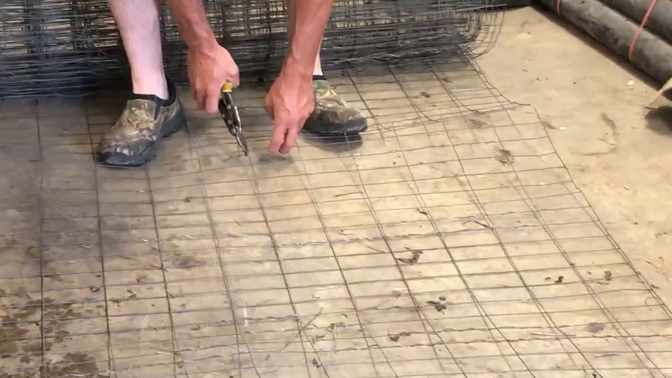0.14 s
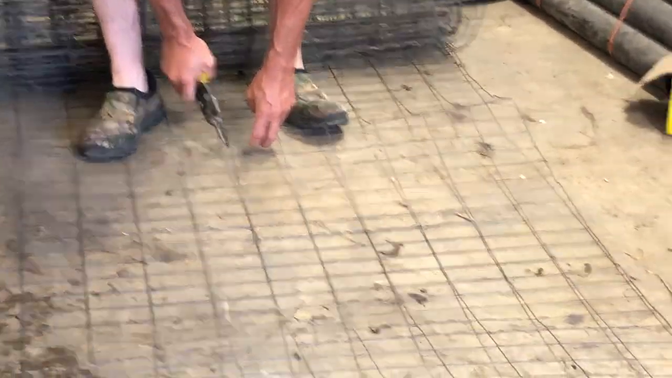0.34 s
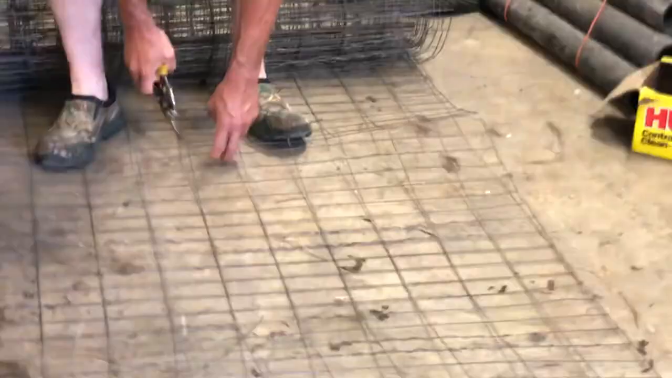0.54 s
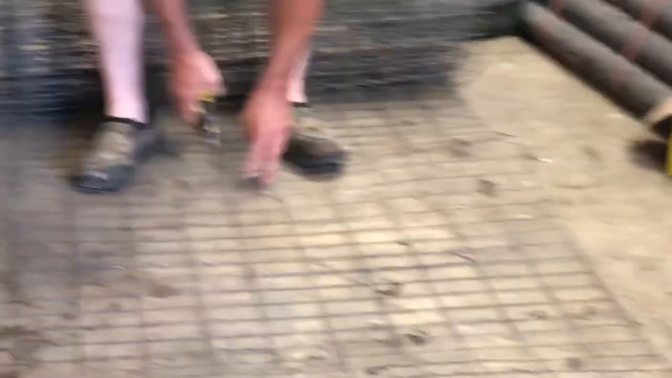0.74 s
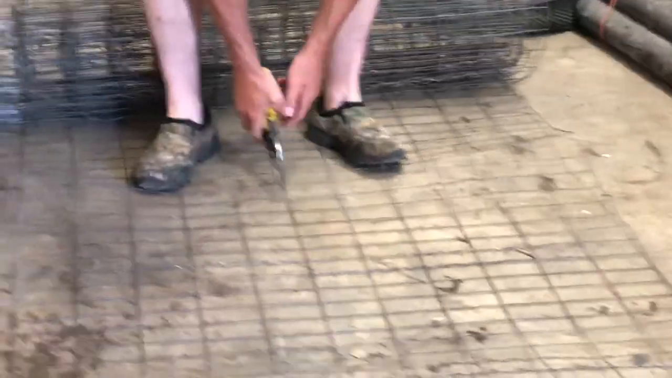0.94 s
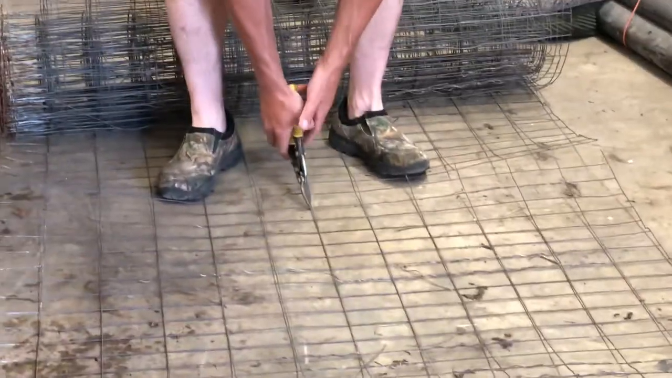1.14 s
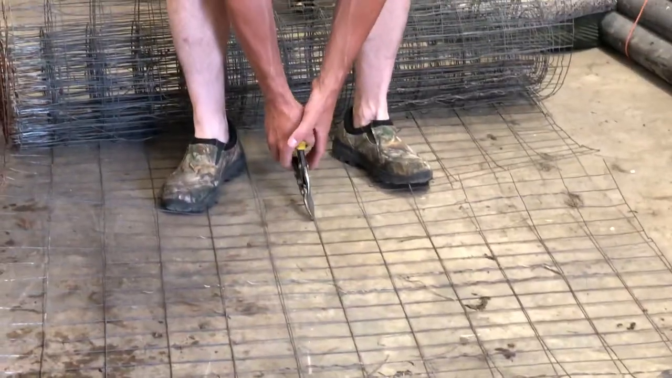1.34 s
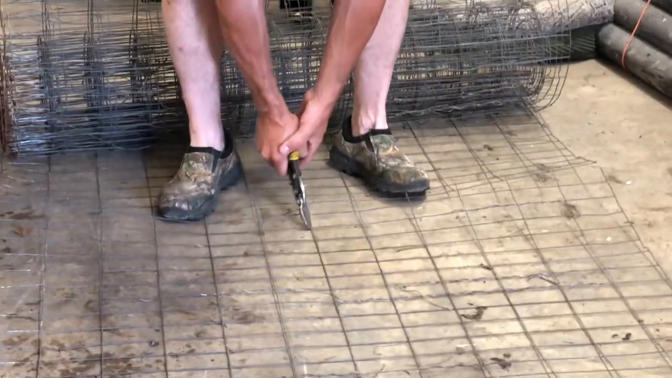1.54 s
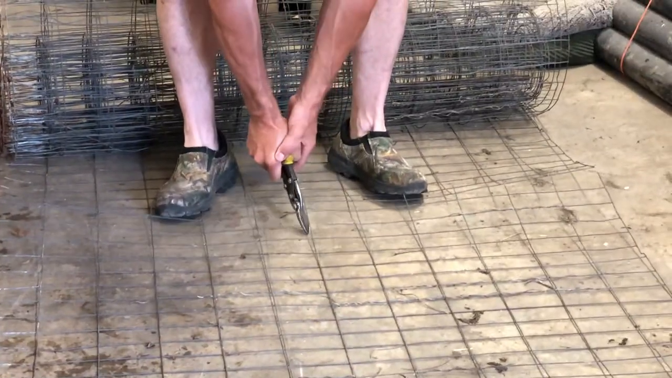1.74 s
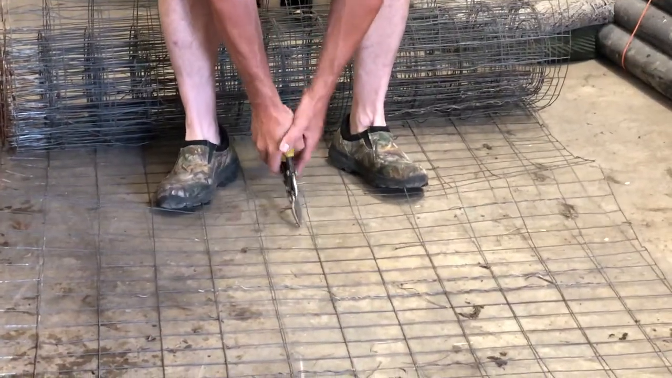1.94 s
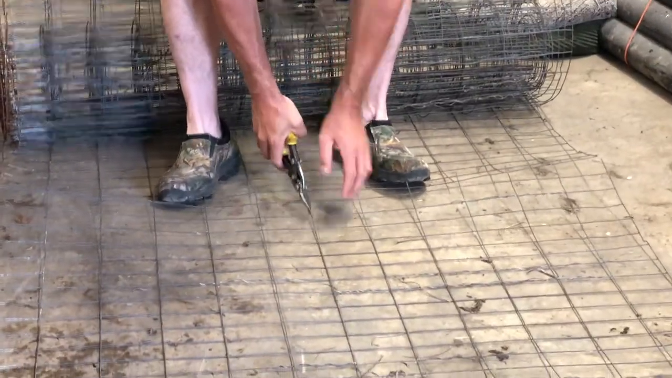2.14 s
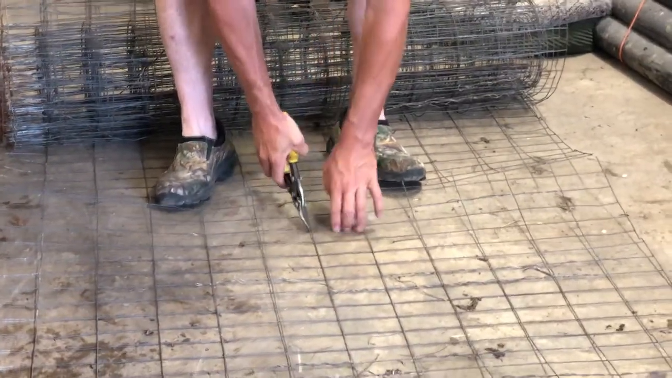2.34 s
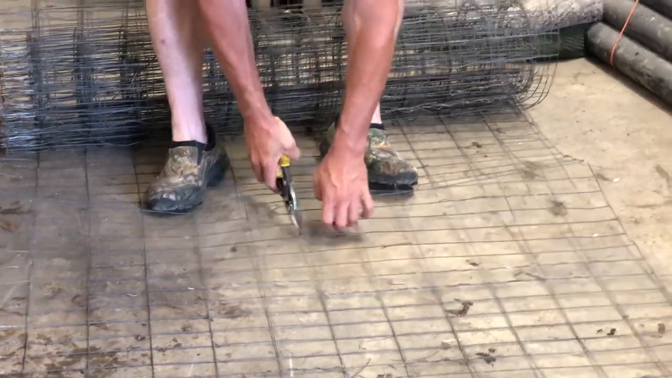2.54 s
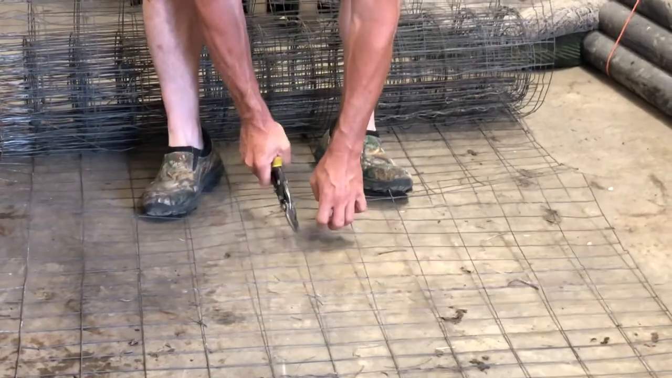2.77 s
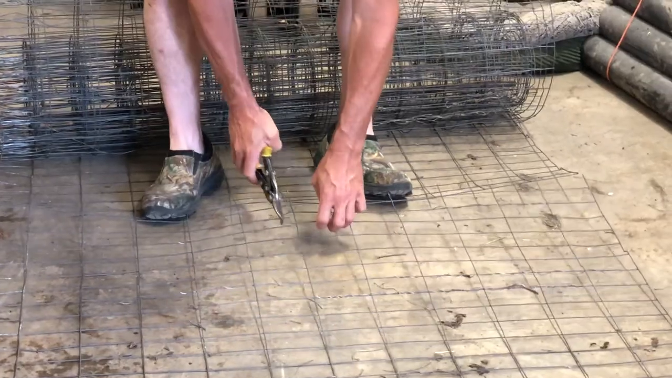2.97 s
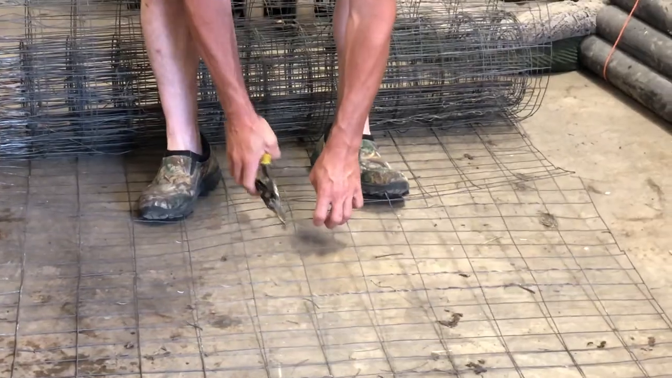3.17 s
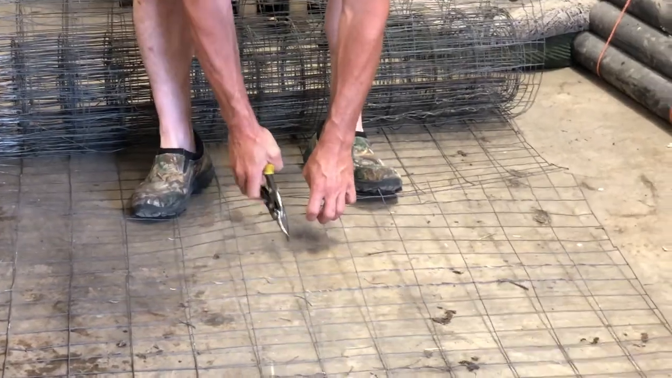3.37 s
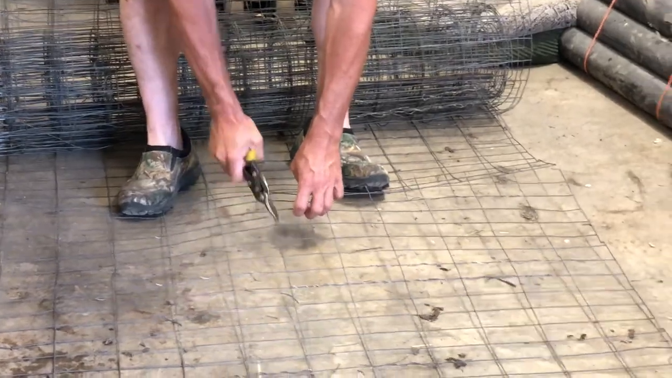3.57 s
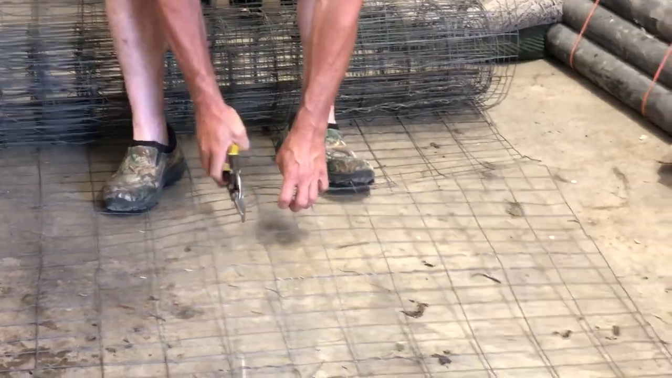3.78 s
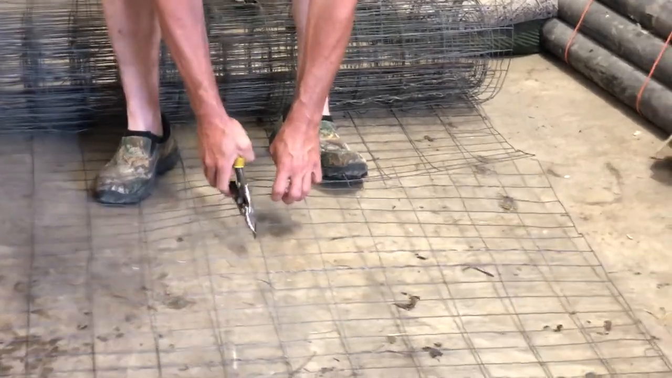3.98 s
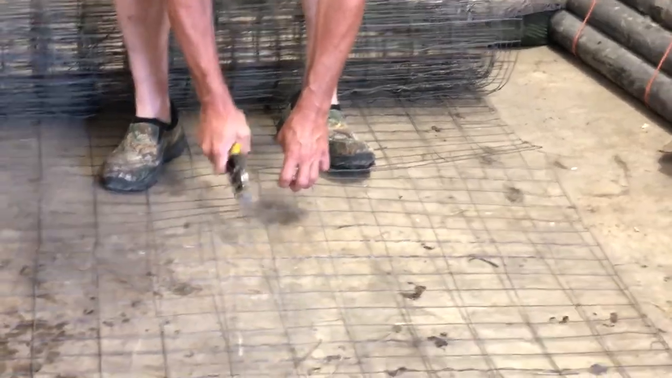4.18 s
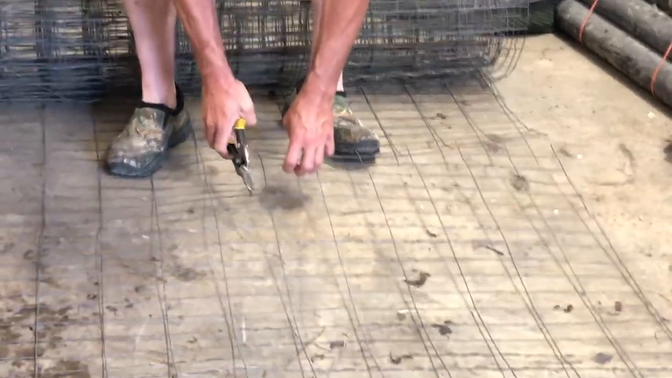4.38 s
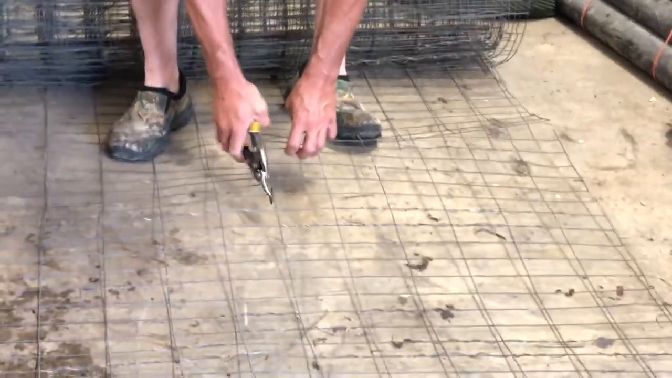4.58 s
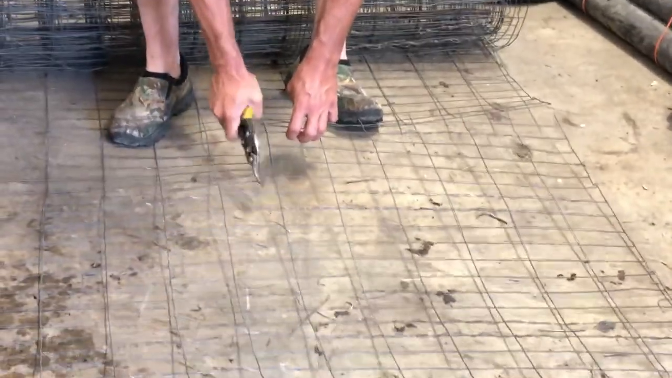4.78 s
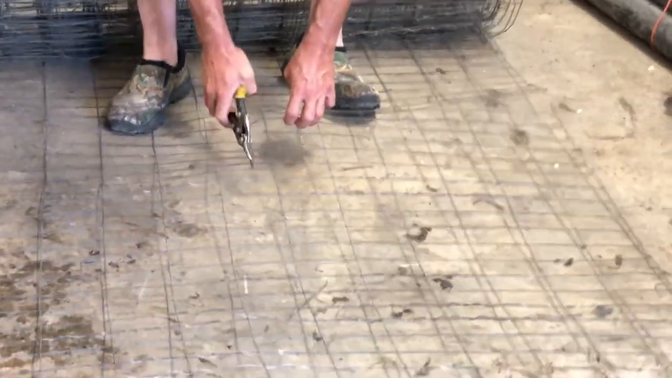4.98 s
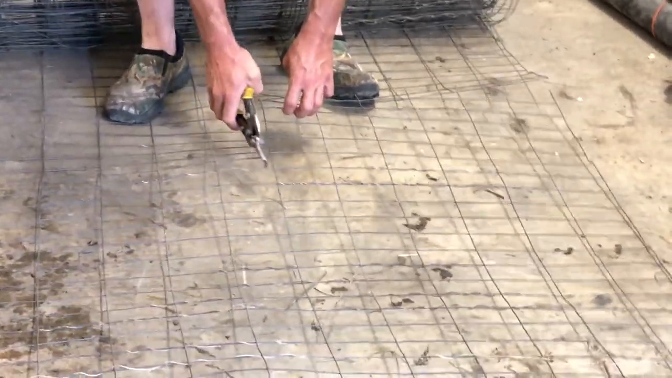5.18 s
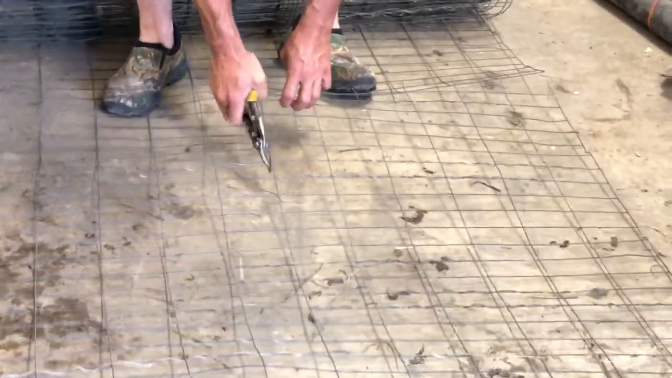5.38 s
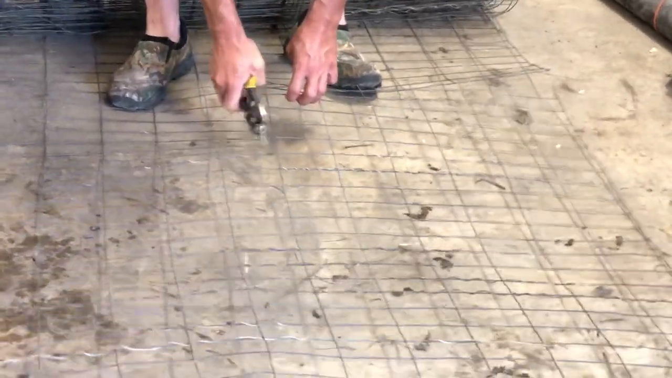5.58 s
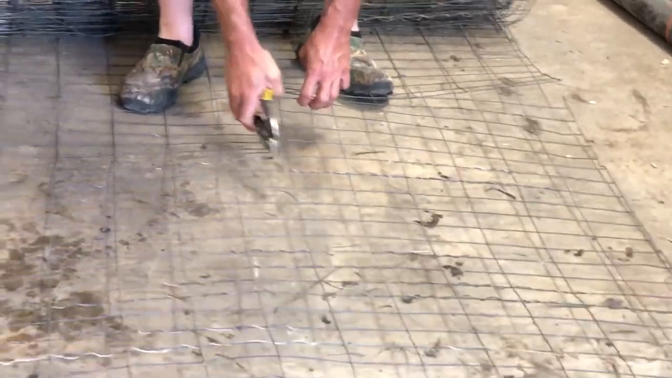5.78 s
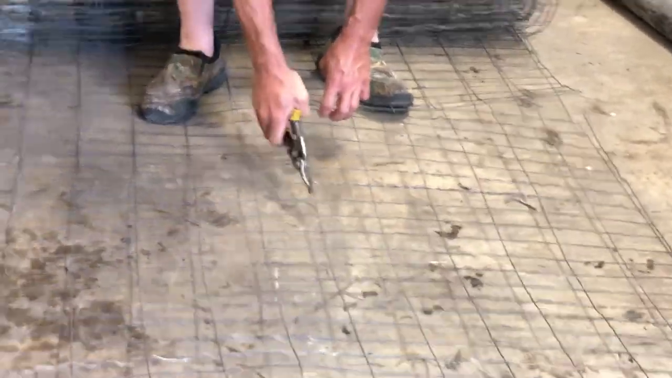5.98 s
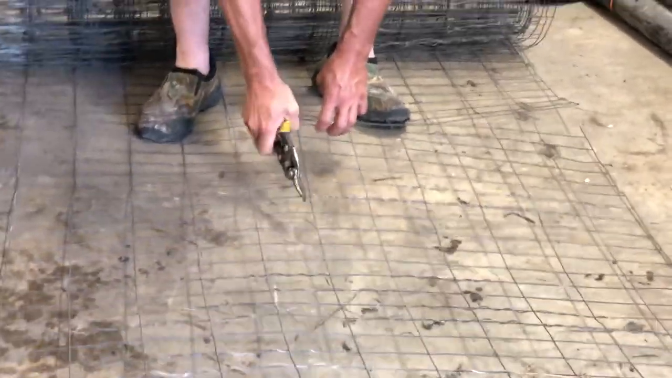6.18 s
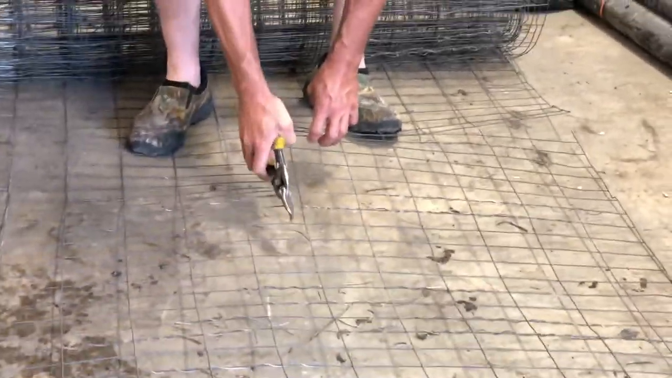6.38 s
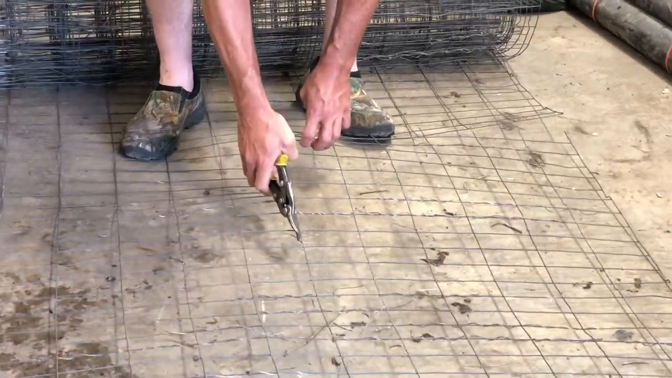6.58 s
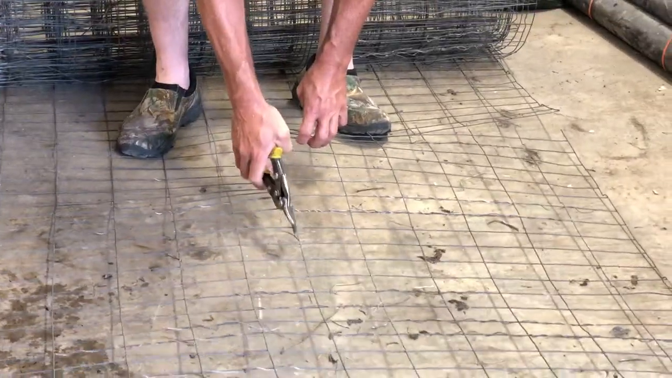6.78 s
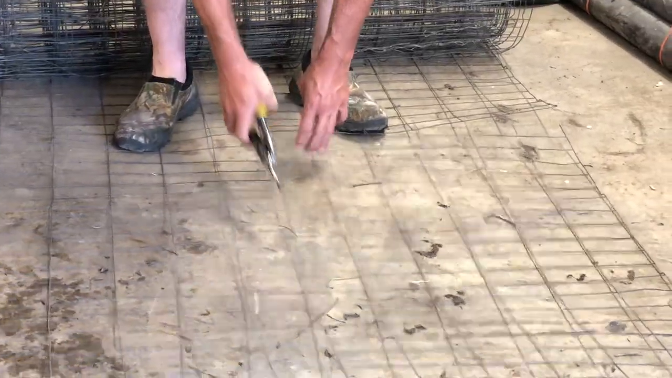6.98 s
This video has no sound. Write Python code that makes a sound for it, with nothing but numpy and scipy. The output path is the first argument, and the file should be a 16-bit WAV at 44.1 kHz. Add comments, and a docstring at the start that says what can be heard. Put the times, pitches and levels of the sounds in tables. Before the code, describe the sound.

Over a faint rush of air and a low motor hum, snips snap through wire fencing eight times, twice with long pauses and then in a steady run. The loud metallic cracks ring briefly and echo around a big workshop as the mesh slaps the floor. Small metal ticks and gritty scrapes of wire on concrete fill the gaps, growing busier in the second half.

```python
"""Air noise and a throbbing motor hum fill a large workshop throughout. Hand snips tick on a welded
wire mesh, which scrapes on the concrete floor. Then the first cut: the strand parts with a crack, the
jaws clap shut, the mesh slaps the floor, the steel rings and the hall answers. After a second cut the
mesh is lifted and six more follow at a quicker pace, with ticks and scrapes between them.
Just after the last cut the level dips briefly; a final tick and scrapes close the scene."""
import sys
import numpy as np
from scipy import signal
from scipy.fft import rfft, irfft
from scipy.io import wavfile
from scipy.ndimage import uniform_filter1d

SR = 44100
rng = np.random.default_rng(int(sys.argv[2]) if len(sys.argv) > 2 else 0)


def dump(signal):
    """Clip the signal to [-1, 1] and save it as 16-bit WAV at the path in sys.argv[1]."""
    limited = np.clip(np.atleast_2d(signal).T, -1, 1)
    pcm = np.round(limited * 32767).astype(np.int16)
    wavfile.write(sys.argv[1], SR, pcm)


N = 309582

# Colour of the moving air. Each row: frequency in Hz, relative level in dB.
AIR_COLOUR = [(18, -46.5), (30, -6.5), (50, -9.5), (64, -10), (77, -1), (179, -2), (345, -6.5), (393, -2),
              (460, -9), (567, -11.5), (757, -12.5), (1660, -20), (2110, -21.5), (4630, -25.5),
              (7230, -26.5), (10200, -27), (15900, -40.5)]
# Steady motor tones; the lowest three beat together. Each row: pitch in Hz, level in dB.
MOTOR_TONES = [(57.43, -65.5), (58.65, -68.3), (58.96, -75.2), (81.8, -80), (114.9, -76), (120, -79.5),
               (398.4, -78)]
# Wavering motor tones. Each row: pitch in Hz, width in Hz, level in dB.
MOTOR_WHIRS = [(173, 10, -70.5), (233, 3, -72.5), (290, 3.3, -73.5), (400, 8, -76.5)]
# Small metal ticks: snips touching the wire, and the bright starts of mesh scrapes.
# Each row: start in seconds, level in dB, pitch in Hz, width in Hz, tail over the tick in dB.
METAL_TICKS = [(.134, -45, 4380, 600, -21), (0.364, -43, 6860, 3060, -24), (.375, -41.5, 6030, 3000, -22),
               (0.9477, -35, 1495, 694, -21.5), (1.172, -53, 4300, 400, -15),
               (1.251, -60, 12000, 4000, -15), (1.382, -59, 6200, 890, -19), (1.436, -47, 1395, 496, -24),
               (1.587, -51, 5600, 912, -25), (1.657, -55, 5600, 900, -22), (1.693, -44.5, 5040, 3860, -14),
               (1.707, -43.5, 3050, 300, -15), (2.294, -44.5, 5040, 5140, -37),
               (2.343, -47, 4500, 700, -17), (2.367, -49, 5000, 710, -19), (2.501, -51, 4350, 170, -10),
               (2.582, -55, 11400, 900, -20.5), (3.299, -53, 13200, 2000, -11.5),
               (3.368, -45.5, 11600, 2000, -20), (3.94, -49, 4320, 400, -14.5),
               (4.052, -47, 11900, 1496, -13), (4.5761, -33, 1500, 1200, -21),
               (4.577, -38.5, 4500, 1500, -19), (4.613, -38, 11600, 3000, -16.5),
               (5.2575, -47.5, 13500, 2000, -13.5), (6.5166, -34.5, 4400, 610, -18)]
# Decay of the hall. Each row: frequency in Hz, t60 in seconds.
HALL_DECAY = [(150, 1), (300, 1.38), (420, 1.11), (1040, 0.94), (1850, 1.044), (2760, 0.88), (4500, 0.85),
              (7280, 0.67), (15000, 0.39)]
# Pipes and rolls of mesh that ring on. Each row: pitch in Hz, width in Hz, weight in dB, t60 in seconds.
HOLLOW_MODES = [(426.6, 11, 2.5, 2.15), (1810, 350, -9, 1.8)]
# Mesh dragged on concrete. Each row: start in seconds, time until it fades in seconds, fizz level in dB,
# change over that time in dB, grind over fizz in dB, upper over lower fizz in dB.
MESH_DRAGS = [(0.142, .03, -67.5, -10, 2, 3), (0.958, 0.19, -57.5, -18, 2.5, 4),
              (1.376, .12, -76, 4.5, 14, -7), (1.633, 0.097, -81.5, 31, 1, 12),
              (2.352, 0.13, -58.5, -10.5, 7.5, -1), (2.502, 0.28, -59, -2, 6.5, 4.5),
              (3.05, 0.22, -65.5, -6, 6, 2), (3.302, .07, -63, 3.5, 7, 7),
              (3.369, 0.095, -48.5, -1, 1, 7.5), (3.601, 0.61, -58, -2.5, 3.5, -3),
              (3.94, 0.12, -52, 2, 0, 1.5), (4.049, .09, -50.5, 3.5, 1, 5), (4.301, 0.49, -62, 10, 0, -6),
              (4.599, .18, -54, 1, 2, -8), (4.952, .29, -56, -2.5, 4, 1), (5.254, 0.1, -55, -1, 3, 4.5),
              (5.348, 0.074, -55, 6.5, 3, -3.5), (5.547, 0.21, -51, -1.5, 1.5, 3.5),
              (5.751, 0.14, -54, -4.5, 4.5, 3), (5.881, 0.24, -49.5, -3.5, 2.5, -3),
              (6.249, 0.29, -55, 1.5, 1.5, 4.5), (6.517, .14, -48, -13.5, 2.5, 8),
              (6.561, 0.41, -54, -9.5, 5.5, -8.5)]
# Colours of a drag's fizz and grind and a strand's crack. Each row: frequency in Hz, weight in dB.
FIZZ_COLOUR = [(1800, -25), (3000, -5), (5000, -4), (7000, -1), (9000, 0), (11800, 1), (13500, -1),
               (15900, -3)]
GRIND_COLOUR = [(180, -30), (300, 2), (590, -6), (1010, -4.5), (1350, -7), (1760, -5), (3250, -8.5),
                (6000, -14), (7800, -34), (13200, -120)]
CRACK_COLOUR = [(59, -57.5), (100, -17), (349, -3.5), (423, -4), (460, -6), (799, -3.5), (1200, -6.5),
                (1450, -8.5), (2210, -6.5), (3600, -6.5), (4950, -11), (5870, -5), (15900, -10)]
# The strands being cut. Each row: start in seconds, crack in dB, mesh ring in dB, jaw clap delay in
# seconds, clap in dB, thump in dB, lift off the floor from 0 to 1, mode pitch as a ratio.
STRAND_CUTS = [(0.3856, -4, -14.5, .0120, -23.5, -13.5, 0, 1),
               (1.7167, -3, -12.5, 0.012, -20.5, -38.5, 0.16, 0.99),
               (2.731, -8, -21.5, 0.007, -6, -12, 0.96, 0.99),
               (3.4748, -6.5, -20.5, 0.0053, -4.5, -10, 0.88, 0.997),
               (4.1372, -6, -19, 0.0068, -6.5, -9, 0.78, 0.99),
               (4.7765, -8, -22, 0.0068, -9, -11, 0.86, 0.974),
               (5.4334, -7, -21, 0.0056, -8.5, -11.5, 0.8, 1.005),
               (6.0612, -2.5, -15.5, 0.0054, -6.5, -15, 0.7, 0.993)]
# Modes of mesh, snips and wire in seven groups. Each mode: pitch in Hz, width in Hz, weight in dB.
STEEL_MODES = [
    [(508, 95, 9.5)],
    [(890, 1100, 10)],
    [(1400, 160, 13)],
    [(2870, 330, 12)],
    [(4416, 370, 13.5)],
    [(4710, 85, 13.5), (5080, 260, 19)],
    [(7040, 420, 11.5), (9340, 1900, 12.5), (12100, 220, -1.5)],
]
# How a cut shakes the mesh, lying and lifted. Each lists: seven mode group weights in dB,
# tilt in dB per octave, crack t60 in seconds.
MESH_LYING = (0.5, -26, -5, -2, 2, -5, -8.5, 0.98, 0.0528)
MESH_LIFTED = (-7.5, 1, -10, -3, -0.5, 1.4, -4.5, 0.76, 0.0725)
# A brief dip in level. Each row: time in seconds, gain in dB.
LEVEL_DIP = [(6.193, -11), (6.202, -24), (6.207, -23.5), (6.213, -12.5)]

AIR_DB, HUM_SWELL_S = -55.5, 4.82  # at this moment the motor tones swell together
RISE_S, BUILD_S = .0004, .010  # attack of a crack, bloom of hall and mesh ring
TICK_T60, TICK_RING = .012, 6.0  # shortest decay in seconds, extra decay times width in s Hz
DRAG_RISE_S, DRAG_T60 = .0054, .15
CATCHES_PER_S, CATCH_DB = 150, -1  # wire ends snagging during a drag
CLAP_T60, RING_T60 = .021, .49
THUMP_HZ, THUMP_END_HZ, THUMP_T60, THUMP_LAG_S = 1500, 220, .022, .0013  # the lag follows the clap
SLAP_DB, SLAP_SHARE, SLAP_HZ = -12, .21, 700  # usual thump over crack; a harder slap adds bass
ROOF_S, ROOF_DB, ROOF_T60 = .0243, -7.5, .012  # roof echo of the crack
WALL_S, WALL_DB = .043, -9  # wall echo of the thump
LOW_CUT_HZ, HIGH_CUT_HZ = 45, 15880


def gain_of(db):
    return 10 ** (np.asarray(db) / 20)


def unit_rms(x):
    return x / np.sqrt(np.mean(x ** 2) + 1e-20)


def curve_at(points, hz):
    f, value = np.transpose(points)
    return np.interp(np.log(hz + 1), np.log(f + 1), value)


def add(mix, start_s, sound):
    part = mix[round(start_s * SR):][:len(sound)]
    part += sound[:len(part)]


def shaped(gain, size):
    """Noise of rms 1 whose spectrum follows gain(hz)."""
    return unit_rms(irfft(rfft(rng.standard_normal(size)) * gain(np.fft.rfftfreq(size, 1 / SR)), size))


def coloured(points, size):
    return shaped(lambda hz: gain_of(curve_at(points, hz)), size)


def resonate(x, hz, width):
    return signal.lfilter(*signal.iirpeak(hz, hz / width, SR), x)


def peak(hz, centre_hz, width):
    """Power of a resonance, 1 at its centre."""
    return 1 / (1 + (2 * (hz - centre_hz) / width) ** 2)


def dying(t, t60, rise):
    return gain_of(-60 * t / t60) * (1 - np.exp(-t / rise))


def workshop():
    """The bed: moving air, close motor tones beating into a throb, and faint whirs above."""
    t = np.arange(N) / SR - HUM_SWELL_S
    hum = sum(np.sqrt(2) * gain_of(db) * np.cos(2 * np.pi * hz * t) for hz, db in MOTOR_TONES)
    whirs = sum(gain_of(db) * unit_rms(resonate(rng.standard_normal(N), hz, width))
                for hz, width, db in MOTOR_WHIRS)
    return gain_of(AIR_DB) * coloured(AIR_COLOUR, N) + hum + whirs


def tick(db, centre_hz, width, tail_db):
    """A small metal tick: a wide click, a ring that lasts longer the narrower it is, and a hall tail."""
    t = np.arange(4096) / SR
    ring = lambda hz: peak(hz, centre_hz, width)
    click = lambda hz: hz / (hz + 1500) / (1 + hz / 9000)
    out = gain_of(db + tail_db) * hall(lambda hz: ring(hz) + .25 * click(hz))
    add(out, 0, gain_of(db) * shaped(ring, len(t)) * dying(t, TICK_T60 + TICK_RING / width, RISE_S / 2))
    add(out, 0, gain_of(db - 2.5) * shaped(click, len(t)) * dying(t, t60=.029, rise=RISE_S / 2))
    return out


def hall(colour, ragged_db=4.0):
    """A dense tail blooms as the walls answer; each band dies at its own speed and hollows ring on."""
    noise = rng.standard_normal(SR + SR // 2)
    hz, frame_s, bands = signal.stft(noise, SR, nperseg=1024, noverlap=768)
    fall = gain_of(-60 * frame_s / curve_at(HALL_DECAY, hz)[:, None])
    flicker = unit_rms(uniform_filter1d(rng.standard_normal(bands.shape), size=24))
    ragged = gain_of(ragged_db * flicker)  # small wire modes come and go
    bands = bands * fall * ragged * colour(hz)[:, None]
    tail = signal.istft(bands, SR, nperseg=1024, noverlap=768)[1][:len(noise)]
    t = np.arange(len(noise)) / SR
    tail += sum(gain_of(db - 60 * t / t60) * colour(f) * resonate(noise, f, width)
                for f, width, db, t60 in HOLLOW_MODES)
    early_rms = np.sqrt(np.mean(tail[:SR // 10] ** 2))
    return tail / early_rms * (1 - np.exp(-(t / BUILD_S) ** 2))


def drag(length, fizz_db, change_db, grind_db, tilt_db):
    """Wire catches on floor grit: a bright fizz and a duller grind, grainy, half a second at most."""
    t = np.arange(SR // 2) / SR
    level_db = fizz_db + change_db * np.minimum(t / length, 1)
    level_db -= 60 * np.maximum(t - length, 0) / DRAG_T60
    grit = gain_of(1.6 * unit_rms(uniform_filter1d(rng.standard_normal(len(t)), 120)))
    snags = rng.exponential(1, len(t)) * (rng.random(len(t)) < CATCHES_PER_S / SR)
    catches = signal.lfilter([1], [1, -np.exp(-1 / (.0013 * SR))], snags)  # each lets go quickly
    fizz = coloured(FIZZ_COLOUR, len(t)) * unit_rms(1 + gain_of(CATCH_DB) * catches)
    lower = signal.sosfilt(signal.butter(2, 10000, fs=SR, output="sos"), fizz)
    fizz = lower / gain_of(tilt_db / 2) + (fizz - lower) * gain_of(tilt_db / 2)
    grind = gain_of(grind_db) * coloured(GRIND_COLOUR, len(t))
    return gain_of(level_db) * (1 - np.exp(-t / DRAG_RISE_S)) * grit * (fizz + grind)


def cut(crack_db, ring_db, clap_s, clap_db, thump_db, lifted, pitch):
    """The strand cracks, the jaws clap, the mesh slaps and rings; roof, wall and hall answer."""
    *groups_db, tilt_db, crack_t60 = np.add(MESH_LYING, lifted * np.subtract(MESH_LIFTED, MESH_LYING))
    t = np.arange(SR // 2) / SR

    def steel(hz, sharp=.39):
        """Colour of the struck steel; a higher sharp makes the modes stand out."""
        modes = sum(gain_of(2 * (group_db + mode_db)) * peak(hz, f * pitch, width)
                    for group_db, group in zip(groups_db, STEEL_MODES) for f, width, mode_db in group)
        bass_db = SLAP_SHARE * (thump_db - crack_db - SLAP_DB) * peak(hz, 0, 2 * SLAP_HZ)
        slope_db = tilt_db * np.log2((hz + 50) / 4000)
        return gain_of(curve_at(CRACK_COLOUR, hz) + bass_db + slope_db) * (1 + modes) ** sharp

    def burst(db, colour, t60, rise=RISE_S):
        return gain_of(db) * shaped(colour, len(t)) * dying(t, t60, rise)

    fracture = lambda hz: steel(hz) * hz / (hz + 2500)  # the break itself has little bass
    out = gain_of(crack_db - 19) * hall(lambda hz: steel(hz, sharp=.3))  # the walls blur the modes
    add(out, 0, burst(crack_db, fracture, crack_t60))
    add(out, 0, burst(ring_db, lambda hz: steel(hz, sharp=.6), RING_T60, BUILD_S))
    add(out, ROOF_S, burst(crack_db + ROOF_DB, steel, ROOF_T60))
    add(out, clap_s, burst(clap_db, fracture, CLAP_T60))
    thump = floor_thump(t, thump_db)
    add(out, clap_s + THUMP_LAG_S, thump)
    add(out, clap_s + THUMP_LAG_S + WALL_S, gain_of(WALL_DB) * thump)
    return out


def floor_thump(t, db):
    """The mesh slaps the concrete: a short tone that dives in pitch."""
    falling_hz = THUMP_END_HZ + (THUMP_HZ - THUMP_END_HZ) * np.exp(-t / .0025)
    return gain_of(db) * dying(t, THUMP_T60, rise=.00056) * np.sin(2 * np.pi * np.cumsum(falling_hz) / SR)


def scene():
    """Cuts, ticks and drags on their cues, over the workshop bed, in mono."""
    mix = np.zeros(N)
    for source, cues in (cut, STRAND_CUTS), (tick, METAL_TICKS), (drag, MESH_DRAGS):
        for start_s, *settings in cues:
            add(mix, start_s, source(*settings))
    return (mix + workshop())[None]


def record(dry):
    """One short dip in level, the bass cut of the microphone, then a steep top cut."""
    dipped = dry * gain_of(np.interp(np.arange(N) / SR, *np.transpose(LEVEL_DIP)))
    thinned = signal.sosfilt(signal.butter(4, LOW_CUT_HZ, "high", fs=SR, output="sos"), dipped)
    top_cut = signal.firwin(255, HIGH_CUT_HZ, window=("kaiser", 9), fs=SR)
    return signal.oaconvolve(thinned, top_cut[None], "same")


dry = scene()
out = record(dry)
dump(out)
```